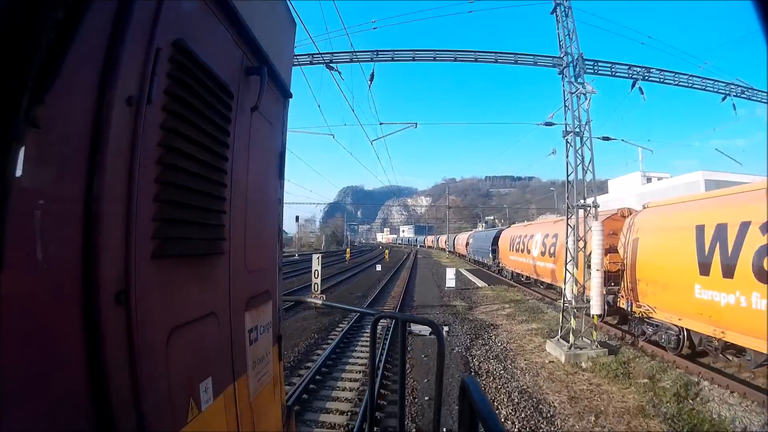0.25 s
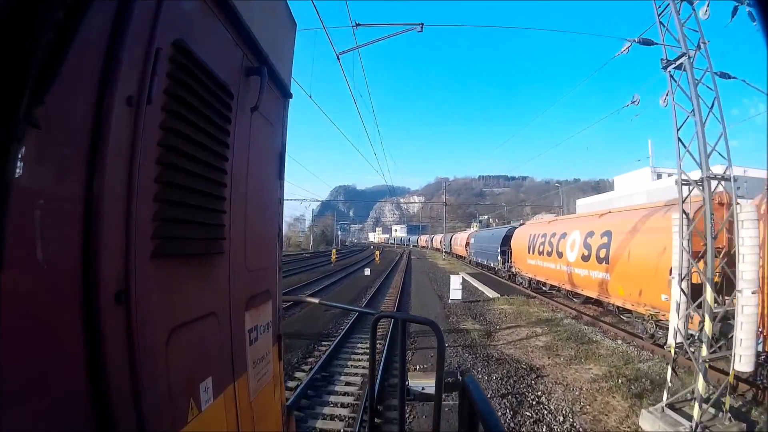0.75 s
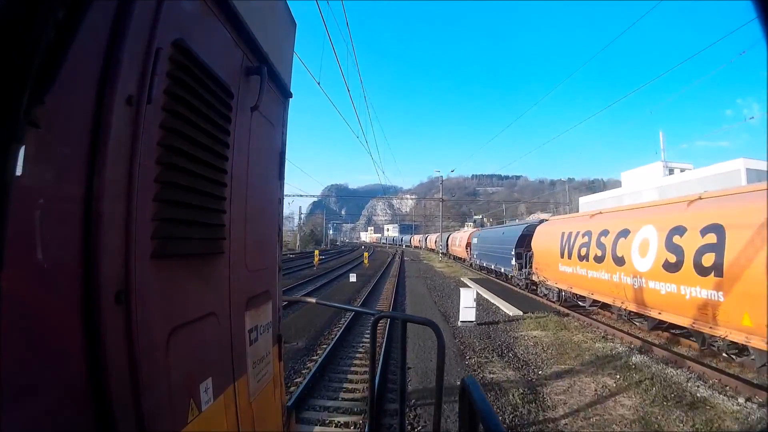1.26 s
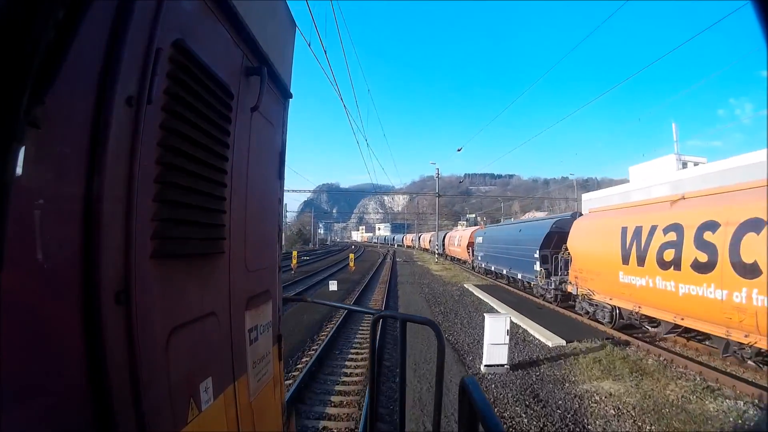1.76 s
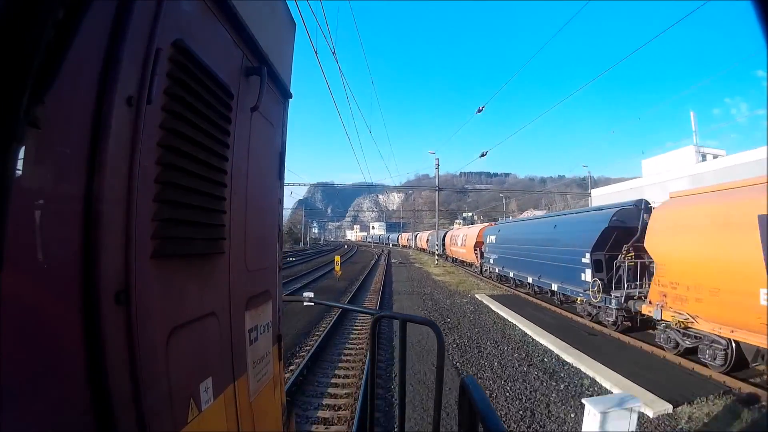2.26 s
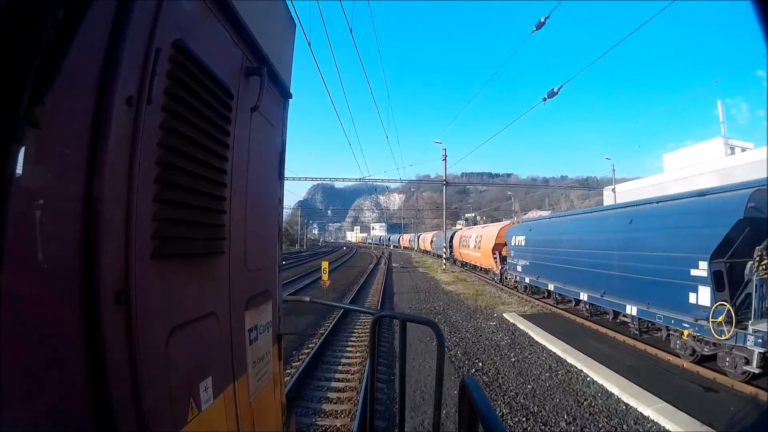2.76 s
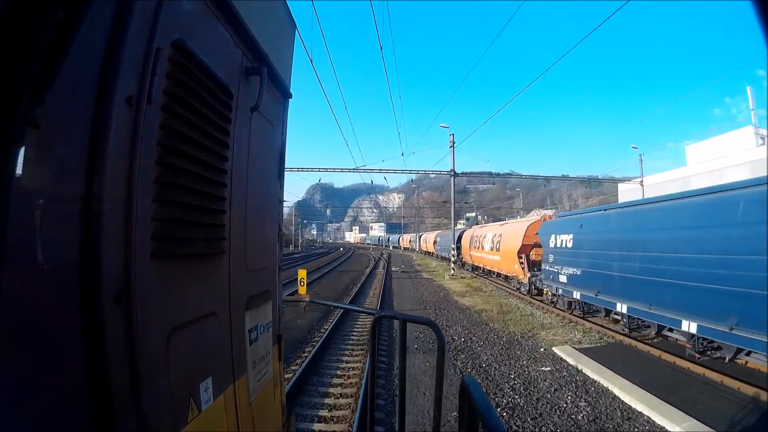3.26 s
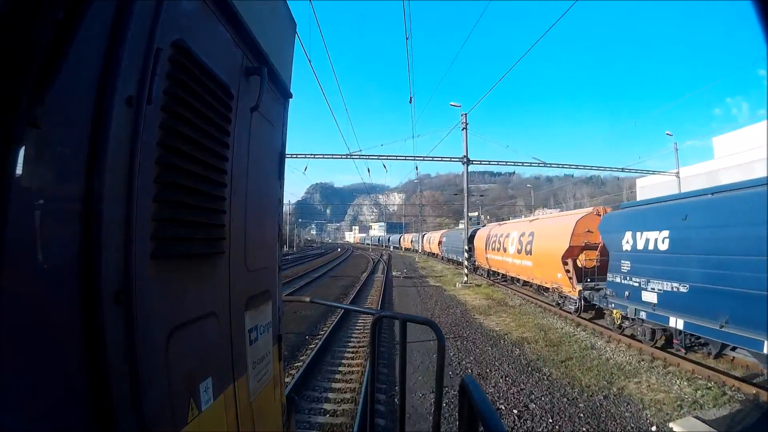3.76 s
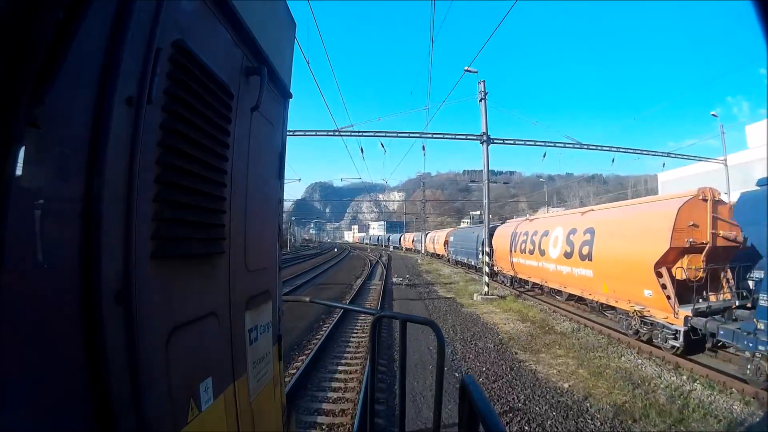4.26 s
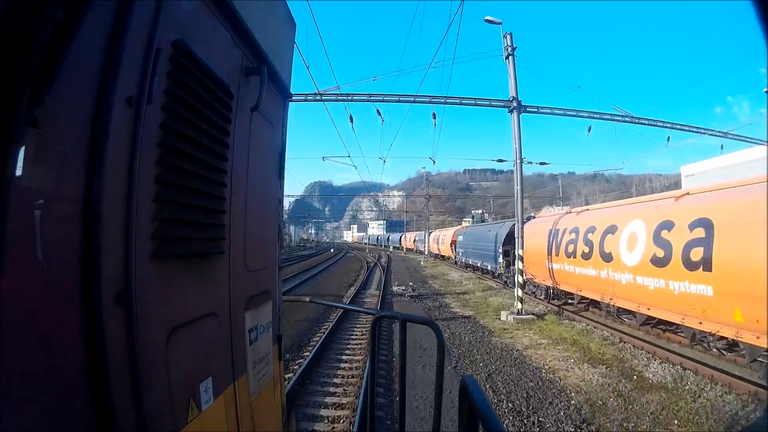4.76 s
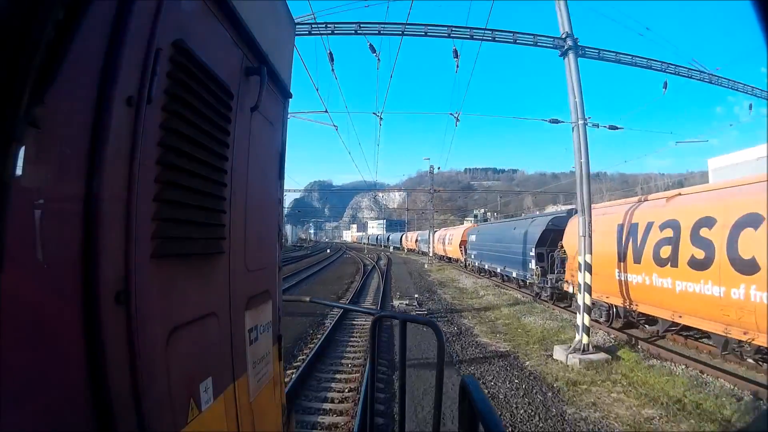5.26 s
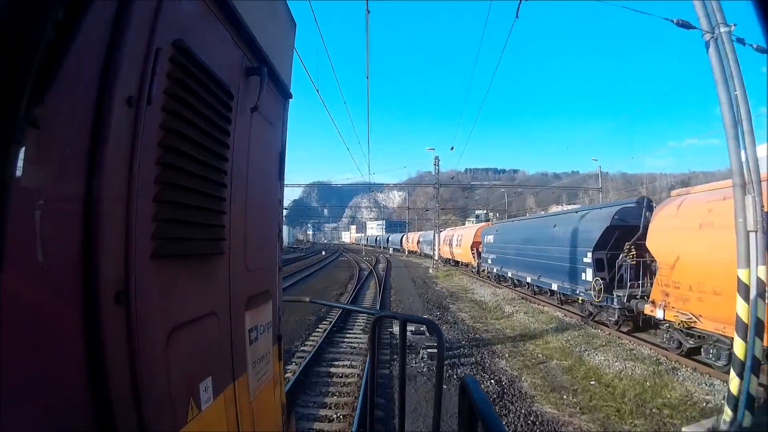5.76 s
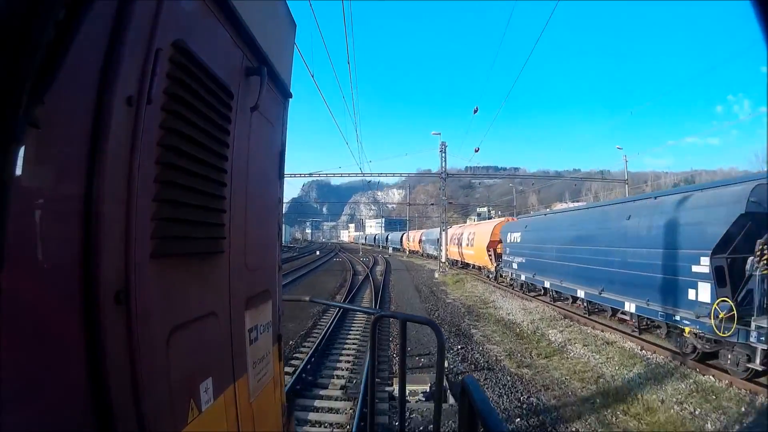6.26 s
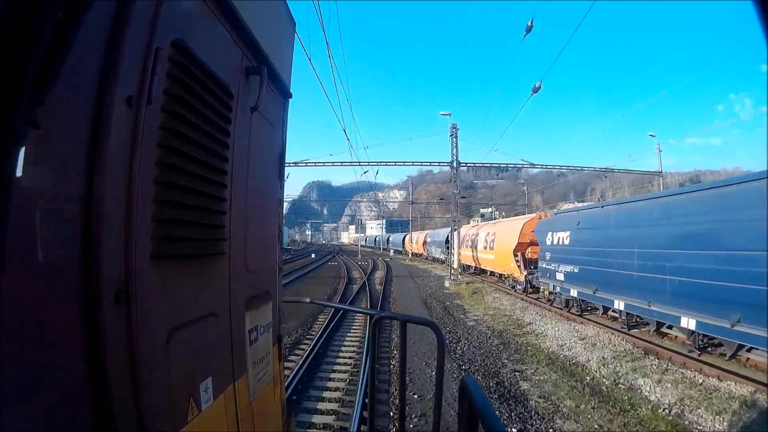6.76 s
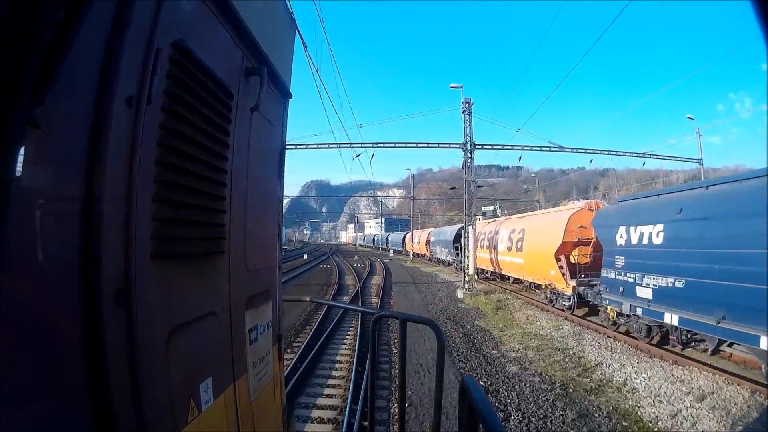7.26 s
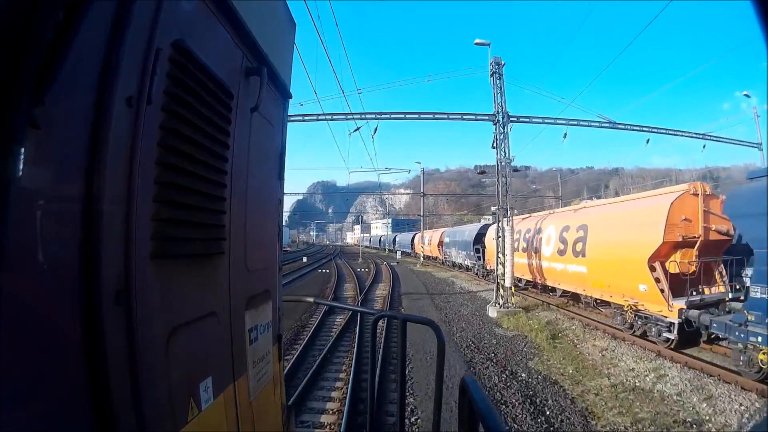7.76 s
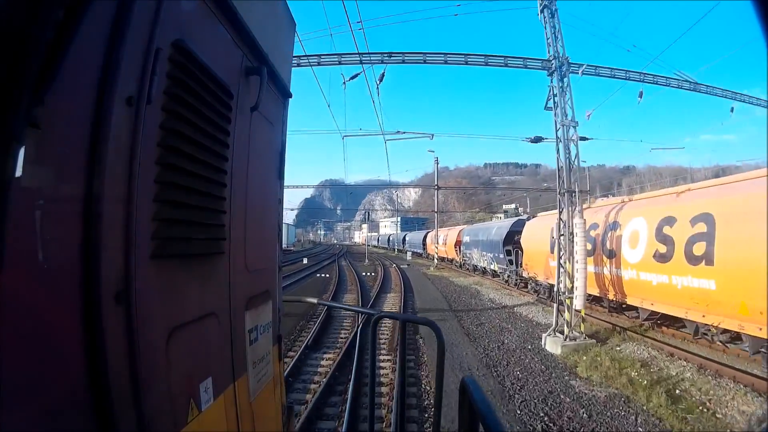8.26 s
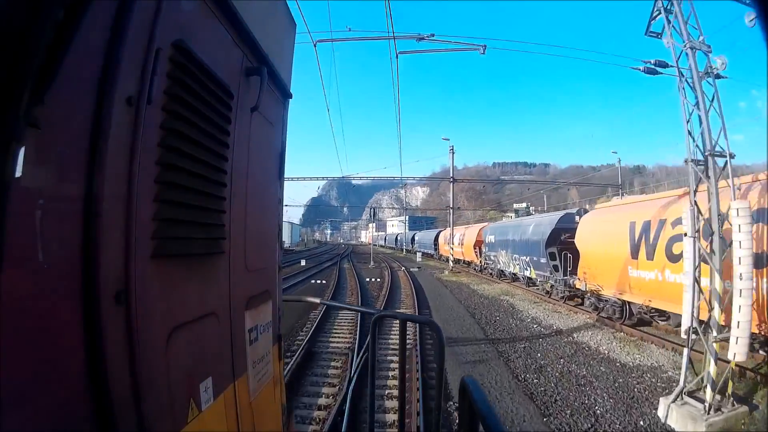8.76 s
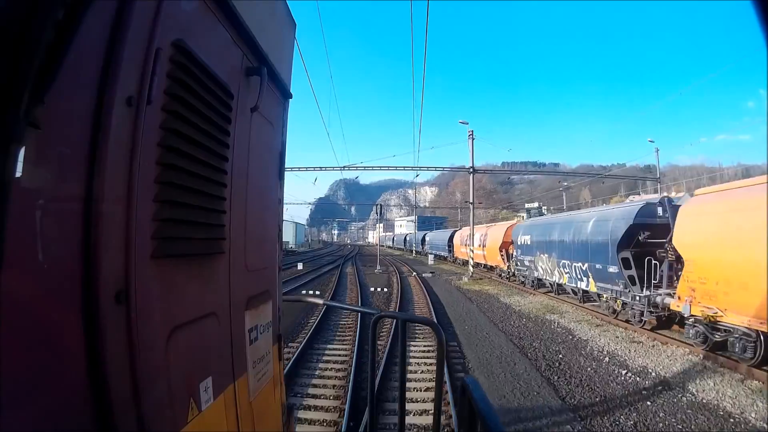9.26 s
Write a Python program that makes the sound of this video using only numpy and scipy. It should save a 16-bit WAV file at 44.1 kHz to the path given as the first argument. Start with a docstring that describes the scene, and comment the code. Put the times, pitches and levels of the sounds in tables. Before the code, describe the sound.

Heard from right beside the engine hood, an idling diesel locomotive moves through a rail yard with a low, unevenly swelling exhaust hum. The engine rattles and knocks throughout, above rumbling wheels, a shuddering frame and a steady panel drone. Something loose ticks quickly near the start, and later the running gear gives a few tiny metallic chirps as the low shudder grows stronger.

```python
"""A deep, surging exhaust boom over engine clatter: a diesel shunting locomotive rolls through a rail
yard at idle, heard from the walkway beside its hood. The boom is the silencer's main resonance. Eight
cylinders rattle the block, one knocking once a cycle, and early on a loose fitting ticks along for a
second. Steel chirps in the running gear; underneath, the wheels rumble on rough rail, the frame
shudders and the hood panels drone."""
import sys
import numpy as np
from scipy import signal
from scipy.fft import rfft, irfft
from scipy.io import wavfile
from scipy.ndimage import uniform_filter1d, map_coordinates

SR = 44100
rng = np.random.default_rng(int(sys.argv[2]) if len(sys.argv) > 2 else 0)


def output_pcm(signal):
    """Save a mono or channel-first signal as 16-bit PCM at the path in sys.argv[1].

    Samples are clipped to [-1, 1] before scaling.
    """
    pcm = np.clip(np.atleast_2d(signal).T, -1, 1) * 32767
    wavfile.write(sys.argv[1], SR, np.round(pcm).astype(np.int16))


N = 420273
TIME = np.arange(N) / SR
CYCLE_HZ, FIRST_KNOCK_S = 5.97, 0.102  # every cylinder fires once a cycle

# accent of each cylinder, in firing order: level/dB
CYLINDER_ACCENTS = [-3.5, -0.5, -1.5, -3, -1, -0.5, 0, -1.5]
# the exhaust boom between its surges: t/s, level/dB
BOOM_BED = [(0.0, -32.5), (0.33, -36), (0.5, -44), (1.4, -42.5), (2.0, -48), (2.7, -45.5), (3.1, -44.5),
            (3.7, -53), (4.4, -49), (5.15, -49), (5.35, -38.5), (5.6, -40), (5.72, -46.5), (6.0, -36),
            (6.2, -35.5), (6.38, -48), (6.85, -35), (7.0, -46.5), (7.2, -34), (7.55, -45.5), (7.8, -51),
            (8.1, -41.5), (9.0, -42.5), (9.52, -43)]
# surges on top of that bed: centre t/s, half-length/s, peak level/dB
BOOM_SURGES = [(0.13, 0.044, -37), (0.551, 0.035, -33.5), (0.666, 0.034, -33), (0.978, 0.044, -27.5),
               (1.065, 0.017, -30.5), (1.158, 0.011, -31), (1.28, 0.13, -37), (1.547, 0.11, -35),
               (1.762, .04, -37.5), (1.909, 0.045, -35.5), (2.054, 0.025, -35.5), (2.212, 0.036, -30.5),
               (2.398, 0.047, -37), (2.519, 0.029, -31.5), (2.672, 0.03, -34.5), (2.857, 0.045, -38.5),
               (3.273, 0.067, -40), (3.391, 0.032, -35.5), (3.468, 0.039, -37.5), (3.593, 0.047, -37.5),
               (3.752, 0.037, -32.5), (3.853, 0.022, -35), (3.987, 0.052, -36.5), (4.09, .04, -48.5),
               (4.562, 0.085, -38), (4.696, 0.045, -34), (4.835, 0.091, -38), (5.832, 0.077, -36),
               (6.24, 0.077, -35.5), (6.427, 0.015, -41), (6.624, 0.04, -35.5), (7.101, 0.049, -29.5),
               (7.258, 0.046, -31.5), (7.406, 0.065, -33.5), (7.662, 0.042, -32), (7.925, 0.067, -34),
               (8.159, .04, -36.5), (8.405, 0.041, -33.5), (8.642, 0.077, -33), (8.814, 0.073, -32),
               (9.098, 0.04, -28), (9.196, 0.033, -31), (9.293, 0.066, -31.5)]
# centre pitch of the boom: t/s, f/Hz
BOOM_TUNING = [(0.0, 197), (0.75, 194.5), (1.75, 194.5), (2.75, 198), (6.0, 198), (7.5, 200), (8.3, 196.5),
               (9.0, 200)]

# fader rides, of which only the swing about the mean is used: t/s, level/dB
RUSH_RIDE = [(0.0, -41.5), (0.7, -41.5), (1.0, -45), (1.5, -41.5), (2.1, -45), (2.23, -37), (2.36, -46),
             (3.2, -50.5), (3.8, -44.5), (4.4, -49.5), (5.1, -48), (6.25, -50), (6.43, -38), (6.65, -50),
             (7.0, -48.5), (7.4, -45.5), (8.0, -48), (9.5, -45.5)]
CLATTER_RIDE = [(0.0, -45.5), (0.96, -49), (1.55, -49), (1.86, -54), (2.15, -51.5), (2.4, -53), (3.45, -56),
                (3.8, -55), (4.92, -55.5), (5.2, -60.5), (5.7, -54.5), (6.34, -51), (6.8, -53),
                (7.1, -48.5), (7.4, -51), (7.58, -56), (7.95, -50), (8.45, -54), (9.52, -51.5)]
WHEEL_RIDE = [(0.0, -46), (1.1, -50), (1.6, -51), (1.9, -49.5), (2.15, -50.5), (3.3, -51), (3.75, -49),
              (4.2, -52), (5.7, -49.5), (6.4, -49), (7.1, -49.5), (7.7, -50), (8.5, -51), (8.95, -48.5),
              (9.5, -49)]
FRAME_RIDE = [(0.0, -48), (0.55, -40), (0.9, -48), (1.35, -43.5), (1.6, -49), (1.98, -45), (2.38, -61.5),
              (2.95, -47.5), (3.3, -58), (3.72, -47), (4.1, -54), (5.05, -56.5), (5.5, -41), (6.24, -35),
              (6.9, -36), (7.3, -36), (7.7, -41.5), (9.52, -42.5)]
HOOD_RIDE = [(0.0, -46.5), (1.92, -51.5), (2.06, -50), (3.58, -54.5), (4.06, -53.5), (4.64, -51.5),
             (5.72, -56.5), (6.08, -51.5), (9.52, -51.5)]

# further knocks, on or between the beats, some strong and many faint: t/s, relative level/dB
EXTRA_BLOWS = [(0.271, -57), (0.44, -73), (0.544, -48), (0.991, -44), (1.278, -55), (1.945, -48),
               (2.147, -47.5), (2.278, -52), (2.616, -51), (3.118, -61), (3.2866, -44), (3.788, -53),
               (3.958, -51), (4.125, -55), (4.292, -47.5), (5.129, -49), (5.2946, -42), (5.465, -42.5),
               (6.1245, -46.5), (6.302, -60), (6.363, -46), (6.485, -57), (7.302, -52), (7.472, -46),
               (7.642, -47.5), (8.15, -53), (8.31, -52.5), (8.647, -48), (8.825, -45), (9.314, -43)]
# the loose fitting's taps, about two per crank turn while it rattles: t/s, relative level/dB
FITTING_TAPS = [(0.591, -36.5), (0.631, -42), (0.6704, -36), (0.7114, -36.5), (0.756, -38), (0.786, -39.5),
                (0.7987, -39), (0.8423, -39.5), (0.881, -42), (0.926, -39.5), (0.954, -46), (0.9685, -37.5),
                (1.010, -38), (1.0525, -41.5), (1.0965, -38.5), (1.136, -44), (1.179, -39), (1.345, -42.5),
                (1.389, -39.5), (1.4315, -42), (1.4757, -37), (1.516, -41), (1.5564, -37.5), (1.6005, -39),
                (2.530, -43), (2.911, -40.5), (2.954, -42), (3.119, -47), (3.714, -44.5), (3.758, -42)]
# chirps from the running gear: t/s, relative level/dB, f/Hz
STEEL_CHIRPS = [(5.296, -31.5, 1730), (5.9677, -33, 1700), (6.2265, -33.5, 1600), (6.241, -33, 1050),
                (6.383, -34, 1700), (6.972, -31, 1770), (7.035, -27, 1620), (8.251, -34, 1210),
                (8.313, -35, 1750), (8.6466, -32, 1780)]

# resonances that colour each source: f/Hz, bandwidth/Hz, relative level/dB
PIPE_RESONANCES = [(182.7, 16.4, 4), (161.8, 25.5, -1), (145.5, 7, 0.5), (219.2, 7.3, -7), (238, 18.3, -11)]
BLOCK_RESONANCES = [(632, 81, -3), (750, 39, -0.5), (900, 86, -2), (1029, 48, 3), (1139, 61, 1.5),
                    (1238, 62, 2), (1317.6, 22, 4.5), (1427, 89, -8.5), (1626, 113, -0.5),
                    (1803, 100, -0.5), (1923, 165, -6.5)]
KNOCK_RESONANCES = [(512, 133, 1.5), (827, 30, 5.5), (947, 130, -2), (1301, 104, 3.5), (1637, 37, -0.5),
                    (1727, 58, 1), (1880, 190, -5.5)]
FITTING_RESONANCES = [(604, 200, -5), (1070, 167, 5.5), (1860, 410, -0.5), (3000, 540, -13.5),
                      (4000, 390, -11)]
HOOD_RESONANCES = [(277.2, 13, 3.5), (324, 17.7, -4), (375.1, 15, -0.5), (400, 24.5, -1), (490, 52, -4.5),
                   (600, 34, -8.5)]

# noise colours of the wheel rumble and background hiss: f/Hz, relative level/dB
RUMBLE_SPECTRUM = [(20, -47), (36, 6.5), (52, -1), (76, 8), (100, -0.5), (118, 1), (140, 4), (250, -7.5),
                   (330, -16), (700, -43)]
HISS_SPECTRUM = [(20, 4), (1500, 7.5), (2400, 6), (3200, 4.5), (5000, 0.7), (8000, -0.5), (14500, -1.5),
                 (15300, -27), (15700, -35)]


def exhaust_boom(wander_hz=2.876, jitter_rad=0.36, flutter_db=1.9, throb=0.22):
    """The main silencer resonance throbs unevenly; turbulence keeps nudging its pitch and strength."""
    hz = np.interp(TIME, *np.transpose(BOOM_TUNING)) + wander_hz * drift(per_s=14)
    phase = 2 * np.pi * np.cumsum(hz) / SR + jitter_rad * drift(per_s=45)
    throbbing = (1 + throb * drift(per_s=36)) * from_db(flutter_db * drift(per_s=55))
    return boom_gain() * level_out(throbbing, span_s=0.07) * np.sqrt(2) * np.sin(phase)


def boom_gain():
    """The boom's envelope: bell-shaped surges add their power to the bed."""
    power = from_db(np.interp(TIME, *np.transpose(BOOM_BED))) ** 2
    for centre_s, half_s, db in BOOM_SURGES:
        near = np.abs(TIME - centre_s) < half_s
        power[near] += (from_db(db) * np.cos(np.pi / 2 * (TIME[near] - centre_s) / half_s)) ** 2
    return np.sqrt(power)


def exhaust_rush(level_db=-44, follows_boom=0.057):
    """Turbulent puffs excite the weaker pipe resonances around the boom and swell slightly with it."""
    pipe = resonate(firing_noise(decay_s=0.0026), PIPE_RESONANCES)
    pipe = cut(cut(pipe, 302, "low", order=5), 119.6, "high", order=4)
    surge = level_out(boom_gain(), span_s=0.74) ** follows_boom
    rush = rms_one(level_out(pipe, span_s=0.079) * surge)
    return from_db(level_db) * ride(RUSH_RIDE, depth=0.83) * rush


def block_clatter(level_db=-56, leak_db=-25):
    """Firings and valve gear rattle the block; treble leaks through the louvres, more when it is loud."""
    block = cut(resonate(firing_noise(decay_s=0.016), BLOCK_RESONANCES), 380, "high", order=2)
    body = cut(block, 2096, "low", order=8)
    leak = from_db(leak_db) * ride(CLATTER_RIDE, depth=0.4) * cut(block, 2400, "high", order=2)
    return from_db(level_db) * ride(CLATTER_RIDE, depth=0.72) * level_out(body + leak, span_s=0.1)


def firing_noise(decay_s, spread_db=3):
    """Noise that jumps with the pressure of each firing and decays to a steady floor; no two are equal."""
    white = rng.standard_normal(N)
    cylinders = len(CYLINDER_ACCENTS)
    firings = ((TIME - FIRST_KNOCK_S) * CYCLE_HZ + 1) * cylinders
    index = firings.astype(int)
    age_s = (firings % 1) / (cylinders * CYCLE_HZ)
    scatter_db = spread_db * rng.uniform(-1.8, 1, index[-1] + 1)
    accent = from_db(np.array(CYLINDER_ACCENTS)[index % cylinders] + scatter_db[index])
    return white * (1 + accent * np.exp(-age_s / decay_s))


def cylinder_knocks(beat_db=-49, uneven_db=2.6, lag_s=0.001, leak_db=-19):
    """One cylinder knocks once a cycle, among further blows and small rattles; each is a gritty burst."""
    beat_s = np.arange(FIRST_KNOCK_S, N / SR, 1 / CYCLE_HZ) + lag_s
    beats = np.transpose([beat_s, beat_db + uneven_db * rng.standard_normal(len(beat_s))])
    bursts = blow_envelope(np.vstack([beats, EXTRA_BLOWS, loose_rattles()]))
    # many small contacts within one blow average to an even grit
    grit = level_out(resonate(rng.standard_normal(N), KNOCK_RESONANCES), span_s=0.013)
    body = cut(grit, 2350, "low", order=8)
    leak = from_db(leak_db) * cut(grit, 3000, "high", order=2)
    return ride(CLATTER_RIDE, depth=0.78) * bursts * (body + leak)


def blow_envelope(blows, attack_s=0.0009, decay_s=0.0078, tail_s=0.026, tail_db=-14):
    """Each blow (t/s, level/dB) has a fast attack, a weaker rebound and a short tail under the hood."""
    rebounds = from_db(-8) * clicks(blows, delay_s=0.0154)
    hits = clicks(blows) + rebounds + 1e-18
    rise, fall, linger = np.exp(-1 / (np.array([attack_s, decay_s, tail_s]) * SR))
    punch = signal.lfilter([1], [1, -fall], hits)
    tail = from_db(tail_db) * signal.lfilter([1], [1, -linger], hits)
    return signal.lfilter([1 - rise], [1, -rise], punch + tail) / (1 + from_db(tail_db))


def loose_rattles(per_s=9, level_db=-54.5, spread_db=3.5):
    """Loose parts under the hood strike at random moments: rows of t/s, relative level/dB."""
    when, strength = rng.random((int(per_s * N / SR), 2)).T
    return np.transpose([when * N / SR, level_db + spread_db * (2 * strength - 1)])


def loose_fitting(contact_s=0.00022, hard_tap_db=-35, softening=0.6, makeup_db=31, bright_db=-24):
    """A fitting taps as the engine shakes it; lighter taps stay in contact longer and sound duller."""
    force = np.zeros(N)
    for s, db in FITTING_TAPS:
        contact_samples = contact_s * from_db(softening * (hard_tap_db - db)) * SR
        age = np.arange(int(contact_samples) + 1) + 0.5
        push = np.sin(np.pi * np.minimum(age / contact_samples, 1))
        force[int(s * SR) + np.arange(len(push))] += from_db(db) * push / push.sum()
    ring = resonate(force, FITTING_RESONANCES)
    return from_db(makeup_db) * (cut(ring, 5400, "low", order=6) + from_db(bright_db) * ring)


def steel_chirps(attack_s=0.0023, trim_db=-12):
    """Steel slips on steel for a few milliseconds and sings one note."""
    out = np.zeros(N)
    for s, db, hz in STEEL_CHIRPS:
        age = np.clip((TIME - s) / attack_s, 0, 20)
        envelope = from_db(db + trim_db) * age * np.exp(1 - age)
        out += envelope * np.sin(2 * np.pi * hz * (TIME - s))
    return out


def wheel_rumble(level_db=-47):
    """Rough rail under the wheels lays down a bed of low noise."""
    rumble = cut(noise(RUMBLE_SPECTRUM), 28, "high", order=3)
    return from_db(level_db) * ride(WHEEL_RIDE) * level_out(rumble, span_s=0.19)


def frame_shudder(level_db=-47.5, hz=24.4, sway_rad=0.16, tremble_db=0.5):
    """The frame shudders on one slightly unsteady sub-bass note."""
    tremble = from_db(tremble_db * drift(per_s=8.1))
    phase = 2 * np.pi * hz * TIME + sway_rad * drift(per_s=9.7)
    return from_db(level_db) * ride(FRAME_RIDE) * tremble * np.sqrt(2) * np.sin(phase)


def hood_drone(level_db=-55):
    """The engine keeps the hood panels droning, with a slight push at each firing."""
    panels = resonate(firing_noise(decay_s=0.0097), HOOD_RESONANCES)
    drone = cut(cut(panels, 640, "low", order=3), 272, "high", order=3)
    return from_db(level_db) * ride(HOOD_RIDE) * level_out(drone, span_s=0.24)


def singing_panel(level_db=-57, hz=382, width_hz=26, peak_s=2.97, spread_s=0.86):
    """One hood panel sings out for a second or two and settles again."""
    ring = resonate(rng.standard_normal(N), [(hz, width_hz, 0)])
    focused = resonate(ring, [(hz, 2 * width_hz, 0)])
    swell = np.exp(-((TIME - peak_s) / spread_s) ** 2)
    return from_db(level_db) * swell * level_out(focused, span_s=0.15)


def from_db(db):
    """Decibels to gain."""
    return 10 ** (np.asarray(db) / 20)


def rms_one(x):
    """Scale to unit power."""
    return x / np.sqrt(np.mean(x ** 2) + 1e-20)


def ride(curve, depth=1):
    """A fader move: the curve's swing about its mean, scaled by depth, as a gain per sample."""
    db = np.interp(TIME, *np.transpose(curve))
    return from_db(depth * (db - db.mean()))


def level_out(x, span_s):
    """Hold the power near 1 over a span, keeping the faster flutter."""
    size = int(span_s * SR) + 1
    return x / np.sqrt(uniform_filter1d(uniform_filter1d(x * x, size), size) + 1e-20)


def noise(spectrum):
    """Noise of a given colour; rms 1."""
    hz, db = np.transpose(spectrum)
    grid = np.maximum(np.fft.rfftfreq(2 * N, 1 / SR), 1)
    shape = from_db(np.interp(np.log(grid), np.log(hz), db))
    return rms_one(irfft(rfft(rng.standard_normal(2 * N)) * shape)[:N])


def drift(per_s):
    """Smooth random wander; rms 1."""
    knots = rng.standard_normal(4096)
    return rms_one(map_coordinates(knots, [TIME * per_s], order=3, mode="wrap"))


def cut(x, hz, kind, order):
    """Butterworth low- or high-pass."""
    return signal.sosfilt(signal.butter(order, hz, kind, fs=SR, output="sos"), x)


def resonate(force, modes):
    """Parallel resonances of alternating polarity."""
    out = np.zeros(N)
    for k, (hz, width_hz, db) in enumerate(modes):
        radius = np.exp(-np.pi * width_hz / SR)
        poles = [1, -2 * radius * np.cos(2 * np.pi * hz / SR), radius ** 2]
        gain = (-1) ** k * from_db(db) * (1 - radius ** 2) / 2
        out += gain * signal.lfilter([1, 0, -1], poles, force + 1e-18)
    return out


def clicks(rows, delay_s=0):
    """One click per row of t/s, level/dB."""
    s, db = np.transpose(rows)
    out = np.zeros(N)
    np.add.at(out, np.clip(((s + delay_s) * SR).astype(int), 0, N - 1), from_db(db))
    return out


def scene():
    """The whole locomotive, close up and in mono."""
    foreground = exhaust_boom() + block_clatter() + cylinder_knocks() + loose_fitting() + steel_chirps()
    bed = frame_shudder() + wheel_rumble() + exhaust_rush() + hood_drone() + singing_panel()
    return (foreground + bed)[None]


def record(dry, hiss_db=-70, whine_db=-94, whine_hz=9524, cutoff_hz=15700):
    """Soft hiss and a faint whine sit behind the mix, and the very top is cut steeply."""
    hiss = from_db(hiss_db) * noise(HISS_SPECTRUM)
    whine = from_db(whine_db) * np.sqrt(2) * np.sin(2 * np.pi * whine_hz * TIME)
    top_cut = signal.ellip(10, 0.1, 80, cutoff_hz, fs=SR, output="sos")
    return signal.sosfilt(top_cut, dry + hiss + whine)


dry = scene()
out = record(dry)
output_pcm(out)
```